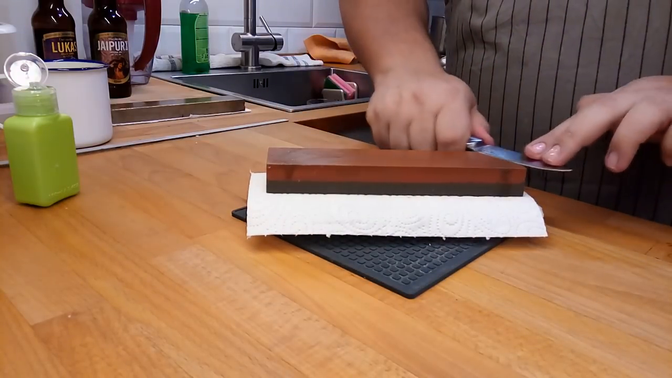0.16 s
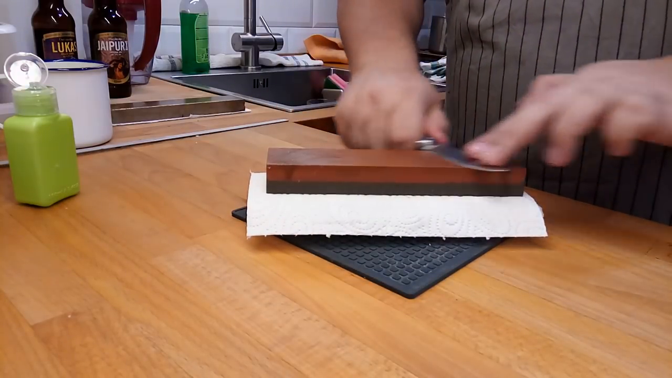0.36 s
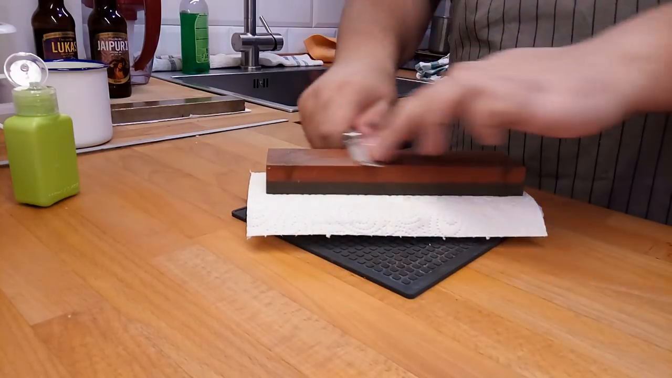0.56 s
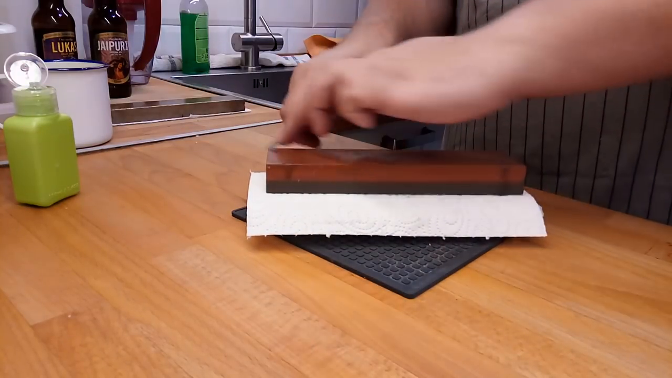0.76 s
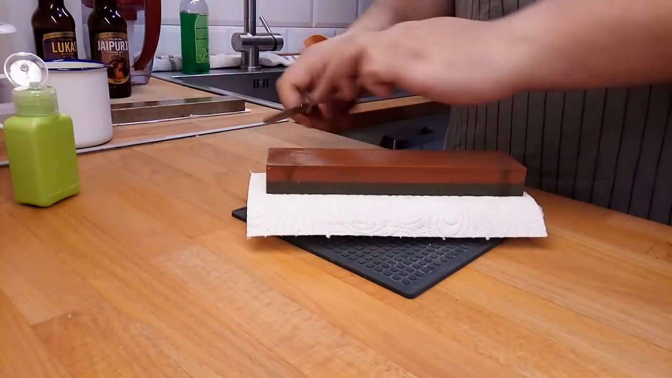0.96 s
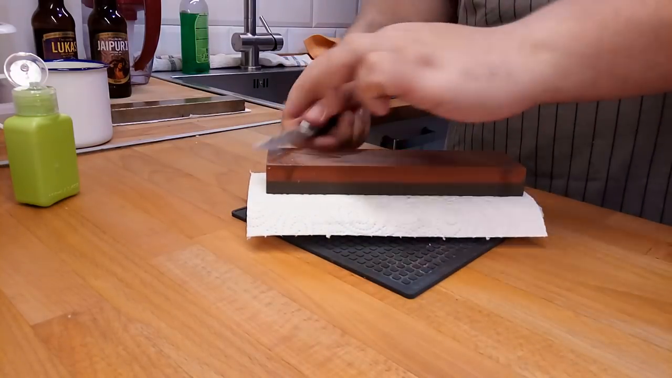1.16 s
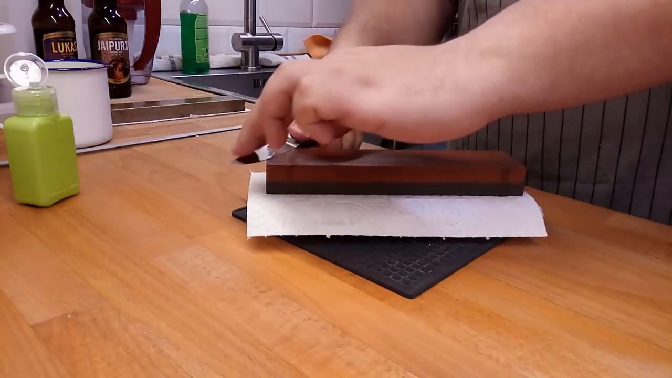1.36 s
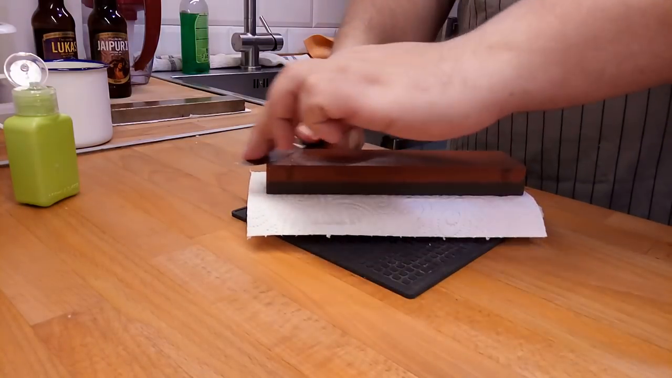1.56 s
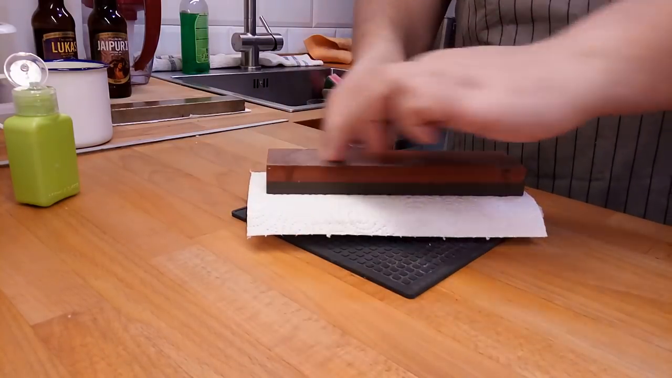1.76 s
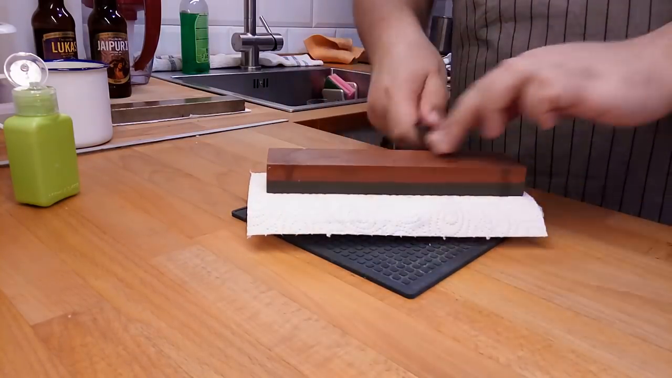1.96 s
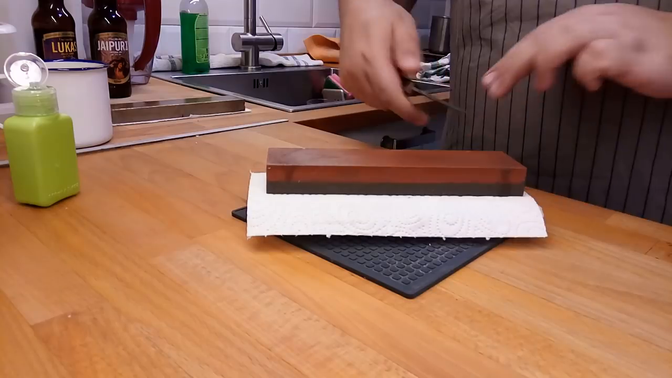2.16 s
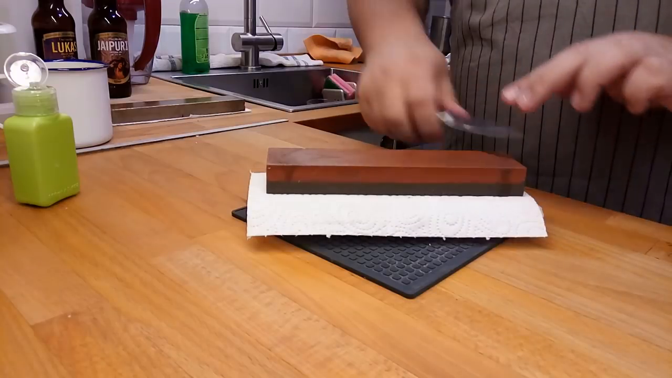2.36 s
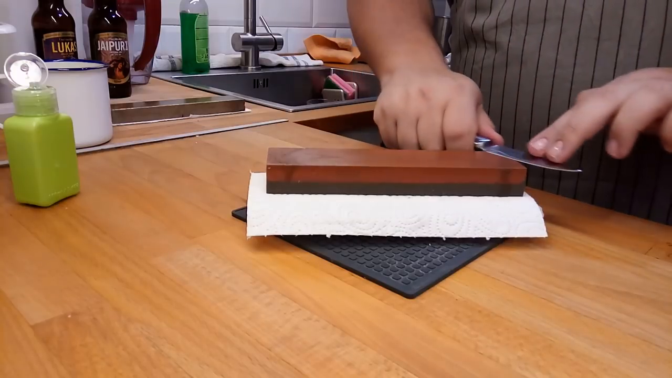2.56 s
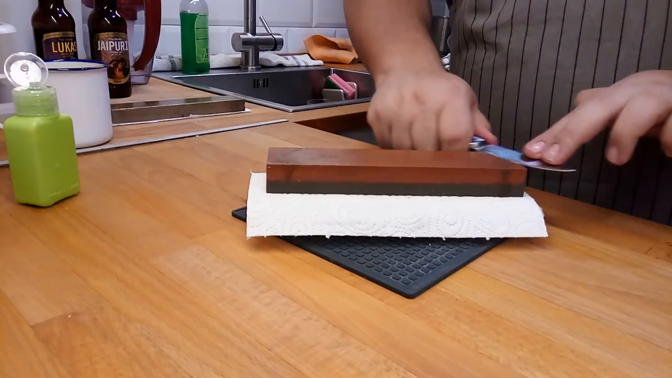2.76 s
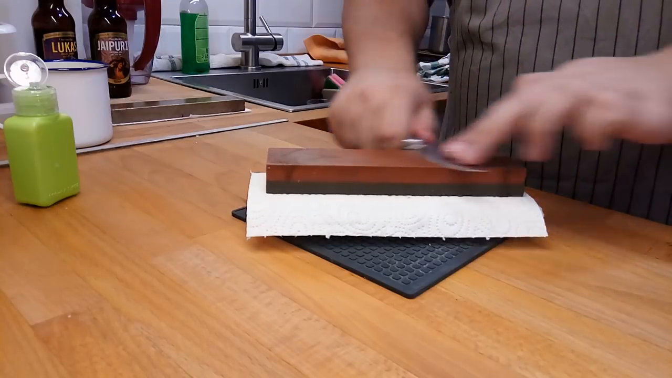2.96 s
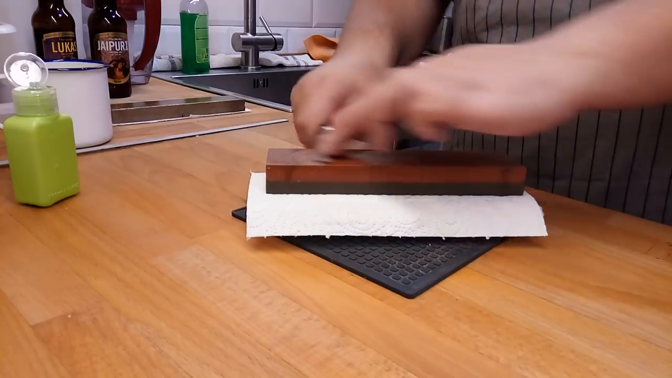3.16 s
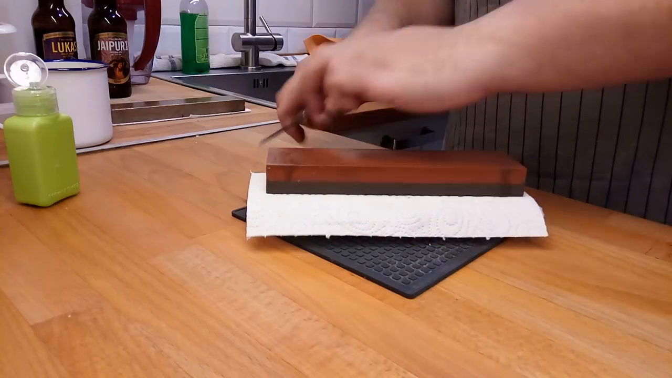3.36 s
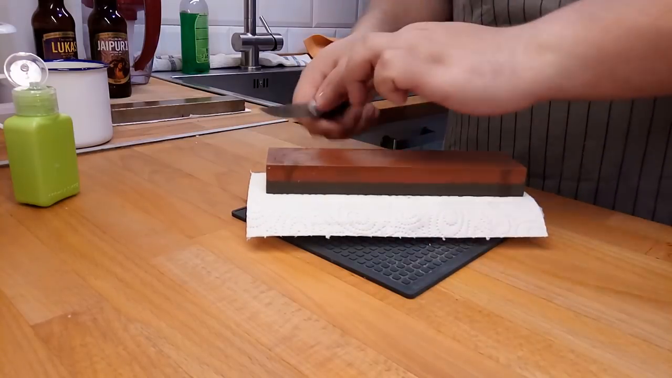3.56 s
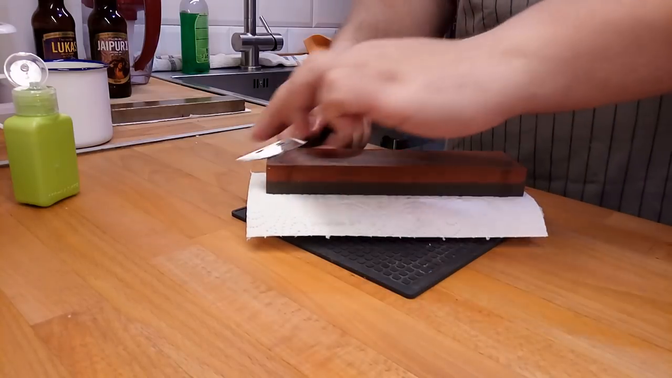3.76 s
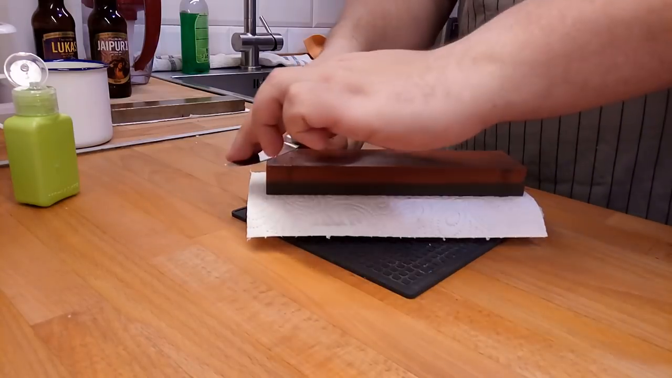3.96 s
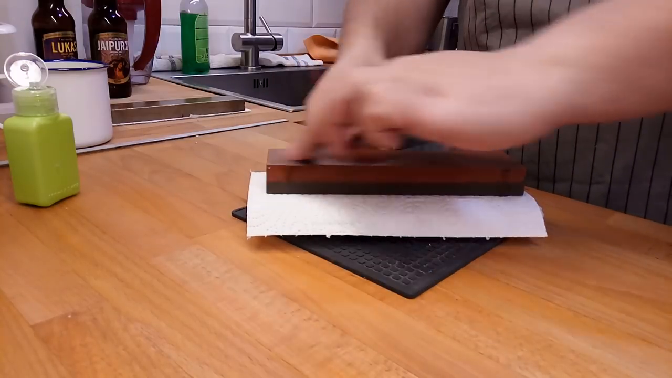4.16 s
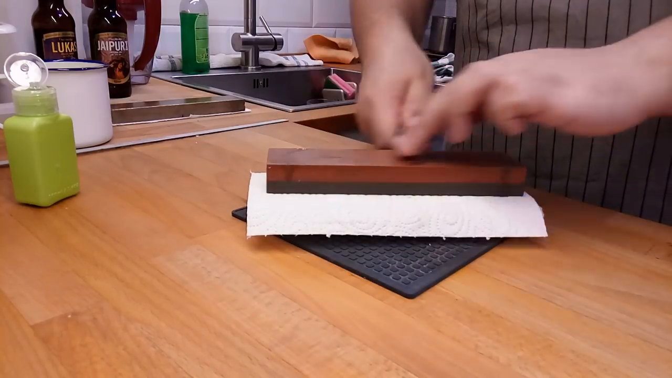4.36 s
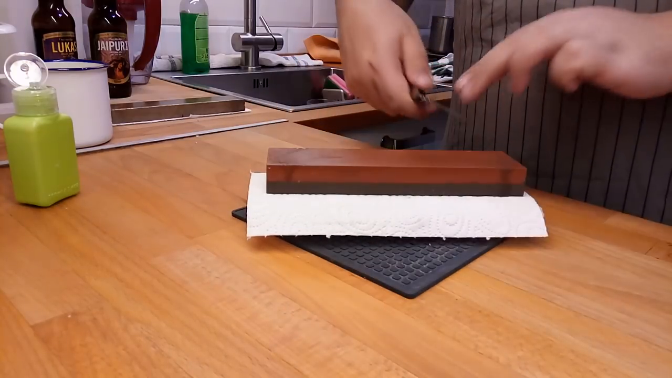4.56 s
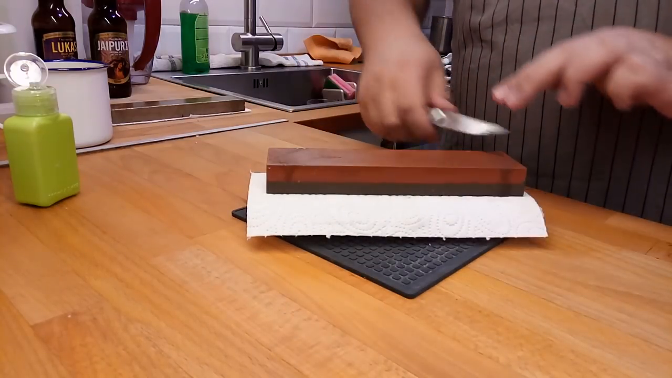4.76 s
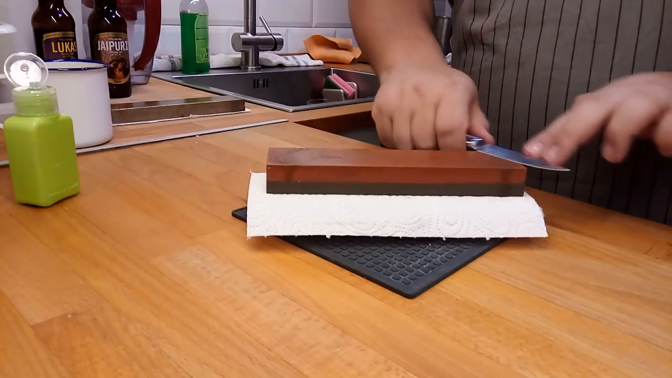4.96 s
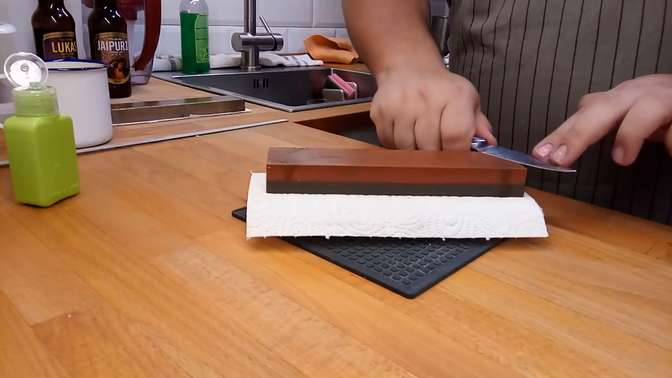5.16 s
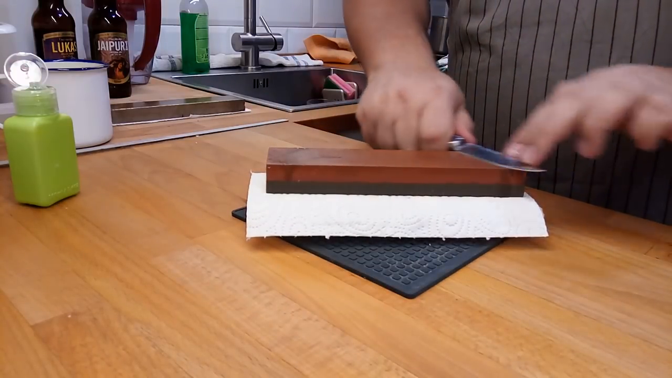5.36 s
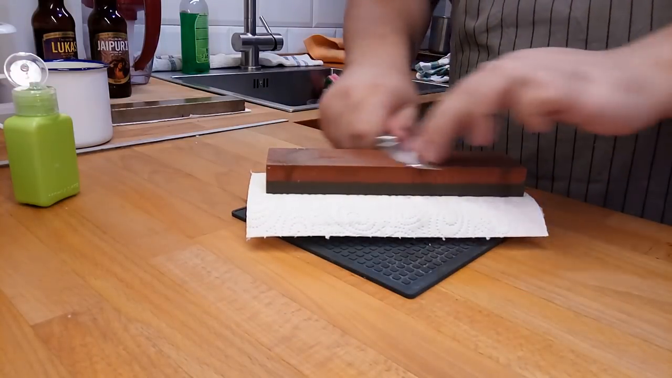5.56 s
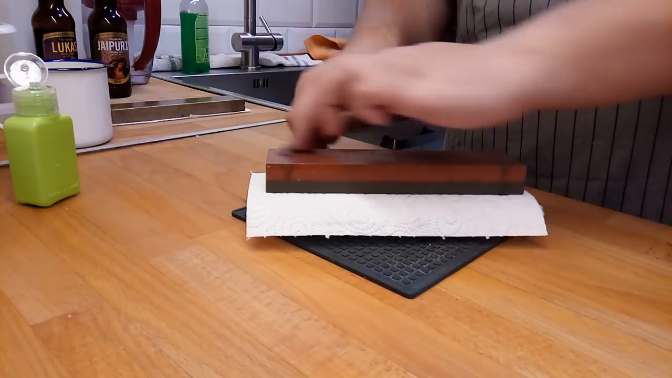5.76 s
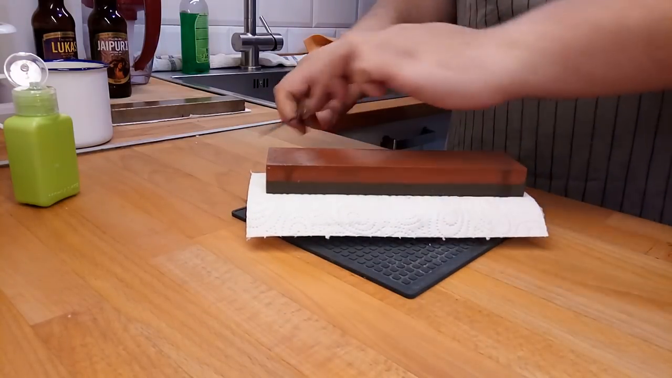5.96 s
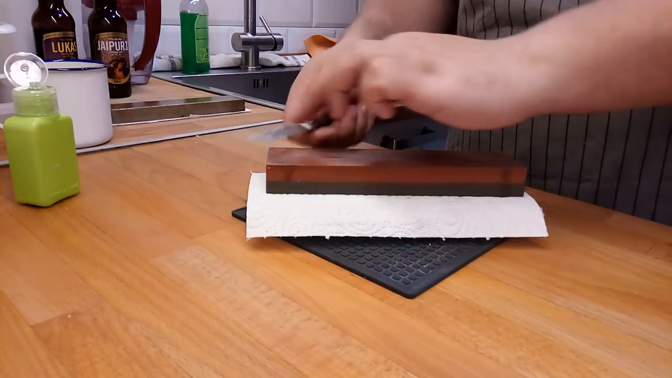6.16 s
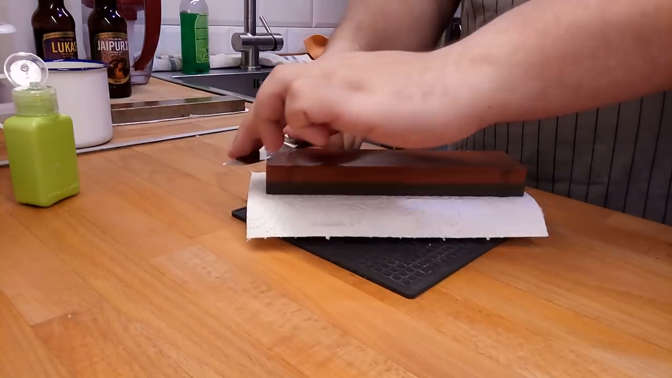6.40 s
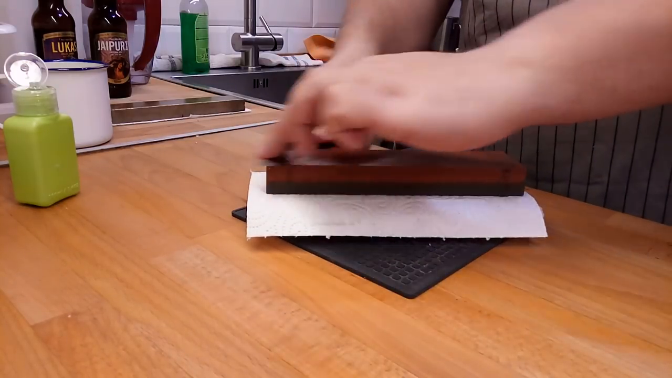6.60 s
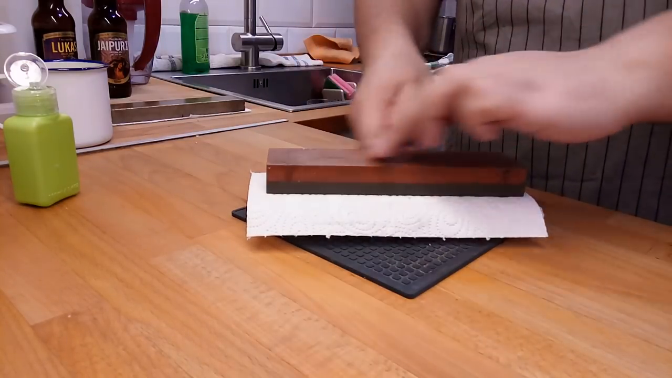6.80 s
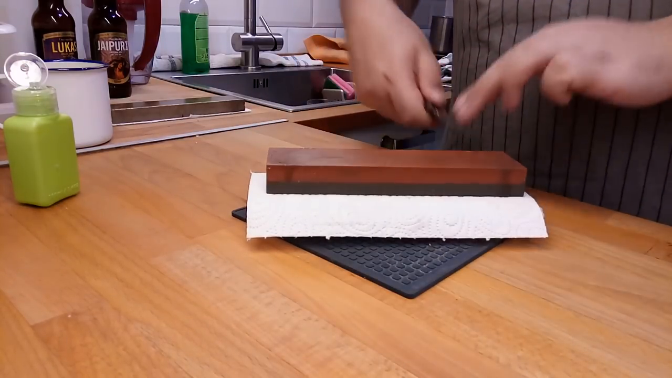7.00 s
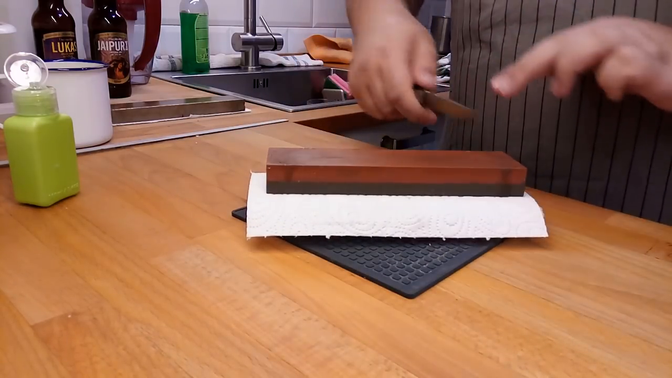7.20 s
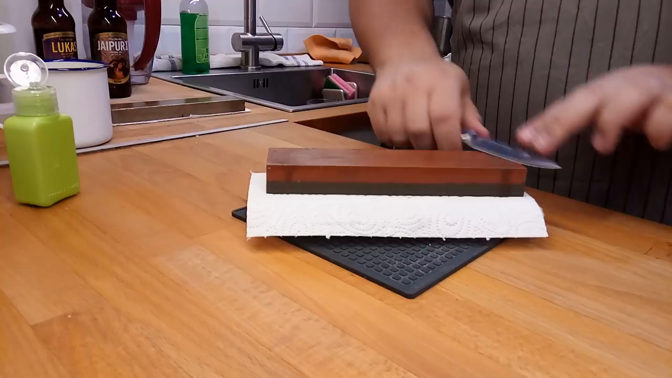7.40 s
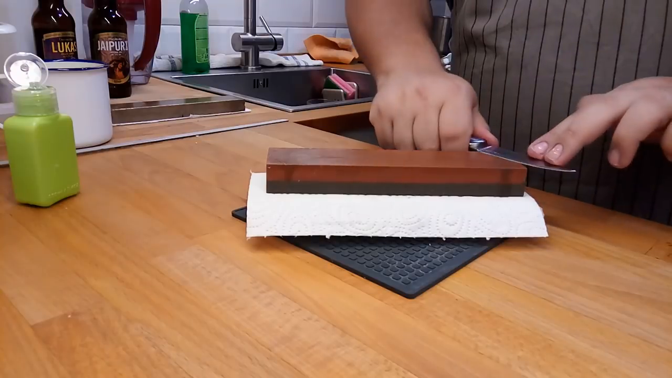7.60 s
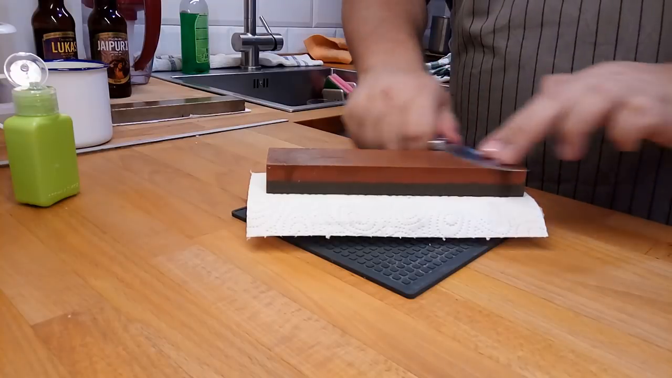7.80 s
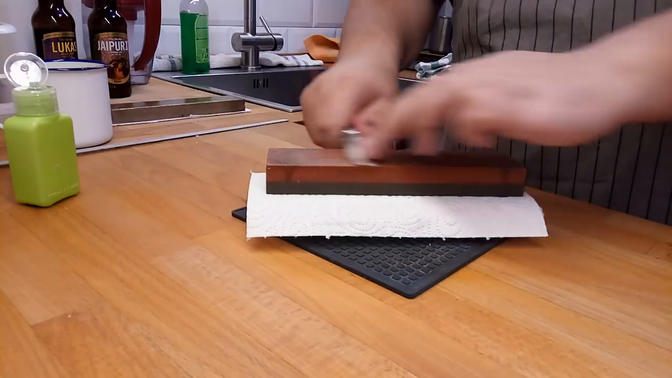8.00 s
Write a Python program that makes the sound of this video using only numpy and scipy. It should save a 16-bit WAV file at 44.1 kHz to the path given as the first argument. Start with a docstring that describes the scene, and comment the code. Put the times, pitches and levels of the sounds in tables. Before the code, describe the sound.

Steel rasps across a whetstone about once a second in a quiet kitchen, the blade ringing briefly and knocking softly between strokes.

```python
"""Over still kitchen air and a faint hum, a knife lands on an oiled stone with a short scrape and rests.
It is drawn from heel to tip: friction rasps through blade resonances that slide with the contact,
while the wooden counter rumbles and the small room answers. The tip flicks off, the blade rings free
and the stone rocks back. Dull knocks come as the blade is turned over, lands or settles. Its sides take
turns for seven passes; one dry tick sounds between strokes, a later one mid-stroke."""
import sys
import numpy as np
from scipy import signal
from scipy.fft import rfft, irfft, next_fast_len
from scipy.io import wavfile
from scipy.ndimage import uniform_filter1d

SR = 44100
rng = np.random.default_rng(int(sys.argv[2]) if len(sys.argv) > 2 else 0)


def store_wav(level_fs):
    """Save 16-bit WAV to argv[1]."""
    pcm = np.round(np.clip(np.atleast_2d(level_fs), -1, 1) * 32767)
    wavfile.write(sys.argv[1], SR, pcm.T.astype(np.int16))


N = 354563
T = np.arange(N) / SR

# Levels are relative. A stage locates the contact: 0 landing, 1 heel, 2 mid blade, 3 belly,
# 4 tip curve, 5 tip.
# Spectra of still air, fine rasp, coarse grinding and counter rumble: frequency_hz, level_db
AIR_SPECTRUM = [(25, -26), (50, -5), (110, -6), (190, 2), (330, -3), (680, -22), (900, -17), (1500, -23),
                (3000, -22.5), (5500, -25), (8100, -32), (11000, -22), (13700, -31), (15300, -23)]
RASP_SPECTRUM = [(1500, -30), (2450, -12), (2830, -11.5), (3080, -6.5), (3700, -3), (4500, -2), (5400, -1),
                 (6500, -2), (7500, -9), (8300, -10), (9500, -2), (11000, -1), (15200, 0.5)]
GRIND_SPECTRUM = [(200, 3), (400, 4), (530, 6), (660, -9.5), (900, 5.5), (1000, 1.5), (1300, 5),
                  (1950, 7.5), (2500, 0), (4000, -1.5), (8000, -54)]
COUNTER_SPECTRUM = [(20, -19.5), (48, -32), (75, -9.5), (108, 4.5), (125, 2), (134, 5), (146, -7.5),
                    (210, -8.5), (245, -20.5), (320, -9), (460, -22), (530, -13.5), (650, -37),
                    (900, -24.5), (4000, -37)]
# The blade is set down and skids until it lies flat:
# start_s, length_s, rasp_db, easing_db_per_s, grind_db, resonance_hz, height_db
LANDINGS = [(0.0, 0.12, -30, 139, -53, 5900, 0), (1.294, 0.22, -31.5, 95, -56.5, 4240, 9.5),
            (2.564, 0.1, -33, 36, -54.5, 5730, -2), (3.804, .19, -30, 18, -60, 5400, -3.5),
            (4.979, 0.18, -28, 66, -55, 5270, -3.5), (6.336, 0.15, -31.5, 17, -60.5, 4900, 3.5),
            (7.498, .11, -35, 52, -58.5, 5600, -3)]
# Brief skids as it is lined up: centre_s, half_length_s, rasp_db
SKIDS = [(1.474, 0.016, -39.5), (1.522, 0.0096, -40), (1.592, 0.034, -47)]
# Draws from heel to tip: start_s, length_s, share_to_mid_blade, build_up_s, rasp_db, grind_db,
# belly_extra_db, grip_tuning_ratio, ring_freedom_db
DRAWS = [(0.128, 0.75, 0.59, 0.099, -33, -55.5, 9.5, 0.95, 0),
         (1.592, 0.6, 0.5, 0.018, -32.5, -56.5, 8, 1.006, -4),
         (2.761, 0.63, 0.53, 0.083, -32, -57.5, 9.5, 0.92, -2),
         (4.051, 0.54, 0.54, 0.021, -34, -57, 8.5, 1.02, -2),
         (5.252, 0.674, 0.622, 0.056, -33.5, -57.5, 6, 0.974, -4.5),
         (6.558, 0.56, 0.52, 0.036, -32.5, -56.5, 5, 1.026, -17),
         (7.674, 0.51, 0.56, 0.056, -32.5, -57.5, -2, 0.94, 5)]
# Sliding resonances of each side of the blade, one path per resonance: stage, pitch_hz, height_db
FIRST_SIDE_PATHS = [
    [(1.2, 5430, -1.5), (1.7, 5980, 8), (2, 7040, 14.5), (2.6, 7900, 18)],
    [(3, 5500, 2), (3.45, 5340, 16), (3.95, 6300, 11.5), (4.3, 6700, 2)],
    [(1.15, 11150, 4), (1.6, 11330, 8.5), (1.85, 12100, 12), (2.2, 12900, 15), (2.7, 10400, 11.5),
     (3.2, 9100, 14.5), (3.6, 7260, 12)],
    [(3, 10550, 15), (4, 10800, 5), (4.4, 10440, 13), (4.65, 11220, 9)],
    [(1.2, 15440, 6), (2.6, 14400, 15.5), (3.3, 14400, 13), (4.3, 14500, -9), (4.7, 15200, 7)],
]
SECOND_SIDE_PATHS = [
    [(1, 5500, 1.3), (1.7, 5300, 5.6), (2.1, 6900, 9.4)],
    [(3.1, 5000, 2.5), (3.8, 6300, 16), (4.1, 7000, 11.4)],
    [(1, 11400, 5.1), (1.7, 10920, 15.5), (1.95, 11500, 16), (2.3, 11200, 13), (2.65, 10400, 14),
     (3.05, 8500, 13), (3.45, 6760, 13.6)],
    [(3.7, 10100, 4.7), (4.25, 11200, 13), (4.6, 10900, 2.2)],
    [(1, 15600, 4.1), (2.2, 14800, 2.3), (2.9, 15200, 17.4), (3.6, 13800, 2), (4.1, 14300, 1.8),
     (4.35, 15300, 5.8), (4.7, 14700, 2.7)],
]
# Spectral valley left by modes with a node under the contact: stage, centre_hz, depth_db
NODE_VALLEY = [(0, 3650, -6), (1.2, 3750, -11), (2, 4750, -11), (2.4, 3450, -8), (5, 3150, -10)]
# Modes of the blade: pitch_hz, edge_driven_db, tip_driven_db, free_db, contact_t60_s
BLADE_MODES = [(2810, -5, -18, -5, .11), (2840, -1, -15, -12, .045), (3339, -10, -26, -30, .08),
               (3962, -11, -22, -19, .07), (4440, -6, -17, -30, .07), (5507, 0, 0, 2, .115),
               (5580, -1, -4, -30, .03), (6250, 3, -4, -30, .015), (7185, -5, -12, -16, .09),
               (10940, -6, -11, -9, .07)]
# How strongly the grit rings the blade as the contact nears the tip: stage, drive_db
TIP_DRIVE = [(2.5, -40), (3.6, -16), (4.3, -4), (5, -6)]
# Counter rumble in each pass:
# settling_db, sliding_db, heel_push_after_start_s, heel_db, tip_push_before_end_s, tip_db
PUSHES = [(-53, -48, 0.24, -42, 0.073, -46.5), (-58, -48, 0.091, -44.5, -0.023, -67),
          (-54.5, -50, 0.2, -45, 0.046, -42.5), (-53.5, -56, 0.2, -45, 0.16, -42.5),
          (-55, -50, 0.031, -45.5, 0.032, -43), (-60, -52.5, 0.16, -50.5, 0.21, -53),
          (-64, -75, 0.11, -46, .03, -68)]
# Reverberation of the kitchen: frequency_hz, t60_s
ROOM_DECAY = [(100, 0.18), (660, 0.48), (1740, 0.6), (4600, 0.6), (12000, 0.38), (16000, 0.45)]
# The tip flicks off the stone: start_s, click_db, ring_db, free_swing_db, thump_db
LIFTS = [(0.878, -29, -39, -51, -50), (2.138, -30, -42, -54, -53), (3.372, -37, -30, -40, -34),
         (4.582, -32, -45, -60, -51), (5.91, -40, -24, -49, -41), (7.063, -36, -42, -51, -58)]
# The edge lands or catches on the stone: start_s, click_db, ring_db
CATCHES = [(1.298, -35, -47), (1.57, -35.5, -59), (2.564, -39, -24), (3.21, -42, -33), (3.33, -45, -30),
           (3.8, -32.5, -48), (4.558, -41, -34), (5.833, -41, -23), (6.342, -33, -48), (6.585, -32.5, -50),
           (6.939, -38, -29), (7.494, -41, -27)]
# Modes of the stone, rocking on the counter and knocked: pitch_hz, level_db, t60_s
ROCKING_MODES = [(83, 4, 0.66), (143, 3, 0.75)]
STONE_MODES = [(536, -8, 0.048), (810, -2, 0.032), (1117, 3, 0.021), (1600, 5.5, 0.026), (1780, 2.5, 0.033),
               (2280, 9, 0.0045)]
# Dull knocks as the blade lands, settles flat or is turned over: start_s, level_db
KNOCKS = [(1.033, -59), (1.496, -41), (2.563, -39), (2.666, -30), (3.992, -33), (5.099, -34.5),
          (6.48, -35.5), (7.013, -38.5)]
# Small dry ticks: start_s, level_db, brightest_hz, decay_s
TICKS = [(1.031, -47, 4200, .007), (5.718, -22, 14000, .0015)]
# Likeness of the two channels: frequency_hz, correlation
COHERENCE = [(100, 1), (300, 0.79), (550, 0.6), (1000, 0.41), (1500, 0.11), (16000, 0.48)]
# Colour difference of the microphones: frequency_hz, left_minus_right_db
BALANCE = [(100, 1), (1700, 2), (5500, 2.5), (8300, 4.5), (11000, 7), (12000, 0), (13000, -3), (14000, 0)]


def amp(db):
    """Amplitude ratio of a level in decibels."""
    return 10 ** (np.asarray(db) / 20)


def unit(x):
    """Normalisation to rms 1."""
    return x / np.sqrt(np.mean(x ** 2) + 1e-20)


def read(points, hz):
    """Interpolation of a spectrum on a log-frequency axis."""
    f, value = np.transpose(points)
    return np.interp(np.log(hz + 1), np.log(f + 1), value)


def follow(rows, at):
    """Linear interpolation of a table's columns along its first."""
    first, *columns = np.transpose(rows)
    return [np.interp(at, first, c) for c in columns]


def add(mix, start_s, sound):
    """Superposition of a stereo sound at a given time."""
    part = mix[:, max(round(start_s * SR), 0):][:, :sound.shape[1]]
    part += sound[:, :part.shape[1]]


def noise(spectrum, size=N):
    """Partly coherent stereo noise: the channels agree in the bass and much less in the treble."""
    full = next_fast_len(size)
    hz = np.fft.rfftfreq(full, 1 / SR)
    left, independent = rfft(rng.standard_normal((2, full)))
    same = np.clip(read(COHERENCE, hz), 0, 1)
    right = same * left + np.sqrt(1 - same ** 2) * independent
    return unit(irfft(np.array([left, right]) * amp(read(spectrum, hz)), full)[:, :size])


def wander(rate_hz, size=N, step=1):
    """Low-pass random fluctuation of rms 1, one value every step samples."""
    full = next_fast_len(size)
    hz = np.fft.rfftfreq(full, step / SR)
    return unit(irfft(rfft(rng.standard_normal(full)) / np.sqrt(1 + (hz / rate_hz) ** 4), full)[:size])


def patches(shape, bins, frames):
    """Smoothed random field of rms 1 over frequency and time."""
    field = rng.standard_normal(shape)
    for axis, size in ((-2, bins), (-1, frames)):
        field = uniform_filter1d(uniform_filter1d(field, size, axis), size, axis)
    return unit(field)


def peak(hz, centre, width):
    """Resonance curve over frequency and time, 1 at its moving centre."""
    return 1 / (1 + ((hz[:, None] - centre) / width) ** 2) ** 2


def swell(centre_s, width_s, db):
    """Gaussian envelope around a moment."""
    return amp(db) * np.exp(-((T - centre_s) / width_s) ** 2)


def contact(start, length, attack_s, release_s):
    """Attack, hold and release envelope of one touch, and the time it has lasted."""
    gate = np.clip((T - start) / attack_s, 0, 1) * np.exp(-np.maximum(T - start - length, 0) / release_s)
    return gate, np.clip(T - start, 0, length)


def background(air_db=-64, hum_hz=134, hum_db=-64):
    """Stationary noise of still air, and a faint hum modulated in phase and amplitude."""
    hum = np.sin(2 * np.pi * hum_hz * T + .5 * wander(4.2)) * amp(hum_db + 2 * wander(0.16))
    return amp(air_db) * noise(AIR_SPECTRUM) + hum


def travel(t, belly=0.27, tip_curve=0.58):
    """Moving boundary conditions: stage of the contact, retuning by the grip, freedom to ring."""
    stage, tuning, freedom_db = np.zeros(len(t)), np.ones(len(t)), np.zeros(len(t))
    for (lands, *_), (start, length, to_middle, *_, grip_ratio, freedom) in zip(LANDINGS, DRAWS):
        shares = to_middle + (1 - to_middle) * np.array([0, belly, tip_curve, 1])
        moments = [lands, start, *(start + length * shares)]
        begun = t > lands - .1
        stage[begun] = np.interp(t[begun], moments, np.arange(len(moments)))
        tuning[begun] = np.interp(stage[begun], [1, 2, 3], [1, grip_ratio, 1])
        freedom_db[begun] = freedom
    return stage, tuning, freedom_db


def pressure(stage, rest_rasp_db=-57, rest_grind_db=-64.5, first_touch_db=-14, tip_ease_db=-1.5):
    """Friction noise follows the load: a landing eases off, the blade creeps, the draw builds up."""
    rasp_gain, grind_gain = np.zeros((2, N))
    for (start, length, rasp_db, easing, grind_db, *_), (drawn, *_) in zip(LANDINGS, DRAWS):
        gate, age = contact(start, length, attack_s=0.00086, release_s=0.0046)
        resting, _ = contact(start + length, drawn - start - length, attack_s=0.011, release_s=0.0046)
        rasp_gain += gate * amp(rasp_db - easing * age) + resting * amp(rest_rasp_db)
        grind_gain += gate * amp(grind_db) + resting * amp(rest_grind_db)
    rasp_gain += sum(swell(*skid) for skid in SKIDS)
    past_bite = stage - 3.79  # here the curved belly bears on a small spot and grinds harder
    bite = np.exp(-(past_bite / 0.68) ** 2)
    ease_db = tip_ease_db * np.clip(past_bite, 0, 1)
    lifted = [row[0] for row in LIFTS] + [np.inf]
    for (start, _, _, build_s, rasp_db, grind_db, bite_db, *_), end in zip(DRAWS, lifted):
        gate, age = contact(start, end - start, attack_s=0.039, release_s=0.0021)
        rasp_gain += gate * amp(rasp_db + first_touch_db * np.exp(-age / build_s) + ease_db)
        grind_gain += gate * amp(grind_db + bite_db * bite + ease_db)
    return rasp_gain, grind_gain


def grit(judder_db=1.16, grain_db=1.16):
    """Amplitude modulation by judder and fine grains; the oil film softens the largest jolts."""
    return unit(amp(2 * judder_db * np.tanh(wander(52) / 2) + 2 * grain_db * np.tanh(wander(420) / 2)))


def landing_resonances(hz, t, sag=0.11, sag_s=0.023, upper_ratio=2.39, width_hz=750):
    """Contact resonance: two peaks of power sink in pitch as the landing blade flattens."""
    power = 0
    for start, length, *_, contact_hz, height_db in LANDINGS:
        centre = contact_hz * (1 - sag * (1 - np.exp(-np.maximum(t - start, 0) / sag_s)))
        height = (t > start - sag_s) * (t < start + length) * amp(height_db)
        power += height ** 2 * (peak(hz, centre, width_hz) + peak(hz, upper_ratio * centre, width_hz))
    return power


def rasp(heel_width_hz=480, flare_db=1.7, fade_stages=0.31):
    """Source and filter: friction hiss passes through blade resonances that slide, waver and flare."""
    hz, t, hiss = signal.stft(rng.standard_normal((2, N)), SR, nperseg=512, noverlap=384)
    stage, tuning, _ = travel(t)
    # the many weaker modes swell and fade as the contact crosses their nodes
    power = amp(2.2 * patches(hiss.shape[1:], 1, 90) + 2.8 * patches(hiss.shape, 2, 34)) ** 2
    power = power / power.mean() + landing_resonances(hz, t)
    # the resonances sharpen where the curved edge bears on a smaller spot
    width = heel_width_hz * np.interp(stage, [1.5, 3], [1, .7])
    side = np.searchsorted([row[0] - .1 for row in LANDINGS[1:]], t) % 2
    for k, paths in enumerate((FIRST_SIDE_PATHS, SECOND_SIDE_PATHS)):
        for path in paths:
            centre, height_db = follow(path, stage)
            centre = centre * tuning * (1 + .011 * wander(25, size=len(t), step=128))
            height = amp(height_db + flare_db * wander(45, size=len(t), step=128))
            beyond = stage - np.clip(stage, path[0][0], path[-1][0])
            presence = (side == k) * np.exp(-(beyond / fade_stages) ** 2)
            power += (presence * height) ** 2 * peak(hz, centre, width)
    valley_hz, valley_db = follow(NODE_VALLEY, stage)
    # single modes sing out briefly as the edge sticks
    singing_db = 2.4 * patches(hiss.shape[1:], 2, 12) + 1.8 * patches(hiss.shape[1:], 3, 4)
    colour_db = read(RASP_SPECTRUM, hz)[:, None] + valley_db * peak(hz, valley_hz, width)
    power *= amp(colour_db + singing_db) ** 2
    filtered = hiss * np.sqrt(power / power.mean((0, 1)))
    return unit(signal.istft(filtered, SR, nperseg=512, noverlap=384)[1][:, :N])


def blade_response(levels_db, longer=1):
    """Impulse response of the blade: damped modes, each lagging in phase on the right."""
    t, lag = T[:SR // 2], np.array([[0], [np.pi / 4]])
    return sum(amp(db - 60 * t / (t60 * longer)) * np.sin(2 * np.pi * hz * t - lag)
               for db, (hz, *_, t60) in zip(levels_db, BLADE_MODES))


def blade_ring(force, stage, freedom_db, straight_drive_db=-17.5, catch_drive_db=-7):
    """Forced and free vibration: grit and catches drive the blade, which rings longer once lifted."""
    _, straight_db, tip_db, free_db, _ = np.transpose(BLADE_MODES)
    straight, tip = blade_response(straight_db), blade_response(tip_db)
    free = blade_response(free_db, longer=3.4)
    ringing = np.zeros((2, N))
    for response, drive_db in ((straight, straight_drive_db + freedom_db / 2),
                               (tip, follow(TIP_DRIVE, stage)[0] + freedom_db)):
        push = force * amp(drive_db) * rng.standard_normal(N)
        ringing += signal.oaconvolve(push[None], response / np.linalg.norm(response[0]), axes=1)[:, :N]
    for start, _, ring_db, *_ in CATCHES + LIFTS:
        response = tip if stage[round(start * SR)] > 2 else straight
        add(ringing, start, amp(ring_db + catch_drive_db) * response)
    for start, _, _, swing_db, _ in LIFTS:
        add(ringing, start, amp(swing_db) * free)
    return ringing


def knife(scrape_db=0.5):
    """Sliding friction: the scrape of rasp and grinding and, apart, the ringing that it excites."""
    stage, _, freedom_db = travel(T)
    rasp_gain, grind_gain = pressure(stage)
    grains = grit()
    ringing = blade_ring(rasp_gain * grains, stage, freedom_db)
    friction = rasp_gain * rasp() + grind_gain * noise(GRIND_SPECTRUM)
    return amp(scrape_db) * grains * friction, ringing


def counter(idle_db=-60):
    """Forced vibration: the wooden top booms as the blade settles and slides and the hands push."""
    gains = [np.full(N, amp(idle_db))]
    for (lands, skid_s, *_), (start, length, *_), push in zip(LANDINGS, DRAWS, PUSHES):
        settling_db, sliding_db, after_s, heel_db, before_s, tip_db = push
        sliding, _ = contact(start, length, attack_s=0.057, release_s=0.083)
        gains += [swell(lands + skid_s, 0.1, settling_db), amp(sliding_db) * sliding,
                  swell(start + after_s, 0.071, heel_db), swell(start + length - before_s, 0.11, tip_db)]
    return np.sqrt(sum(gain ** 2 for gain in gains)) * noise(COUNTER_SPECTRUM)


def room(direct, early_db=-7, tail_db=-8, echoes_per_s=4000):
    """Reverberation: early reflections from counter and body, then the tail of the tiled kitchen."""
    t = T[:32768]
    taps = rng.standard_normal((2, len(t))) * (rng.random((2, len(t))) < echoes_per_s / SR)
    early = taps * np.exp(-t / .008) * (t > .0005)
    hz, age, late = signal.stft(taps * (t > .006), SR, nperseg=256)
    decay = amp(-60 * age / read(ROOM_DECAY, hz)[:, None])
    tail = signal.istft(late * decay, SR, nperseg=256)[1][:, :len(t)]
    response = sum(amp(db) * part / np.linalg.norm(part, axis=1, keepdims=True)
                   for db, part in ((early_db, early), (tail_db, tail)))
    return direct + signal.fftconvolve(direct, response, axes=1)[:, :N]


def clicks(rows, spectrum, decay_s):
    """Broadband transients: coloured noise with a sudden onset and exponential decay."""
    out, t = np.zeros((2, N)), T[:2048]
    for start, db, *_ in rows:
        add(out, start, amp(db) * noise(spectrum, size=len(t)) * np.exp(-t / decay_s))
    return out


def struck(modes):
    """Modal superposition after one blow, peak 1, alike in both channels."""
    t = T[:SR // 2]
    sound = sum((-1) ** k * amp(db - 60 * t / t60) * np.sin(2 * np.pi * hz * t)
                for k, (hz, db, t60) in enumerate(modes))
    return np.array([sound, sound]) / abs(sound).max()


def stone():
    """Damped oscillation: the stone rocks back as the blade leaves; its higher modes give dull knocks."""
    thumps, knocks = np.zeros((2, 2, N))
    thump, knock = struck(ROCKING_MODES), struck(STONE_MODES)
    for start, *_, db in LIFTS:
        add(thumps, start, amp(db) * thump)
    for start, db in KNOCKS:
        add(knocks, start, amp(db) * knock)
    return thumps, knocks


def ticks():
    """Band-limited transients: tiny dry ticks, each brightest around its own frequency."""
    return sum(clicks([(start, db)], [(hz / 4, -22), (hz, 0), (hz * 3, -14)], decay_s)
               for start, db, hz, decay_s in TICKS)


def scene(ring_into_room=0.4):
    """Superposition of all sources; only a share of the thin blade's ring excites the room."""
    scrape, ringing = knife()
    edge_clicks = clicks(CATCHES + LIFTS, RASP_SPECTRUM, decay_s=0.0077)
    thumps, knocks = stone()
    in_room = room(scrape + edge_clicks + knocks + ticks() + ring_into_room * ringing)
    return in_room + (1 - ring_into_room) * ringing + thumps + counter() + background()


def record(dry, cutoff_hz=15600):
    """Linear filtering: the two microphones differ in colour, and a low-pass limits the band."""
    full = next_fast_len(N + 4096)
    lean_db = read(BALANCE, np.fft.rfftfreq(full, 1 / SR)) / 2
    heard = irfft(rfft(dry, full) * amp([lean_db, -lean_db]), full)[:, :N]
    low_pass = signal.firwin(511, cutoff_hz, window=("kaiser", 9), fs=SR)
    return signal.oaconvolve(heard, low_pass[None], "same")


dry = scene()
out = record(dry)
store_wav(out)
```